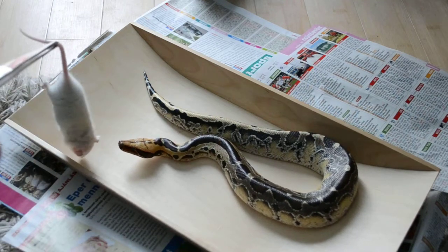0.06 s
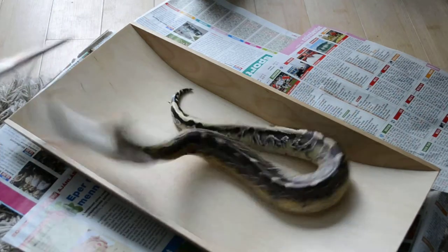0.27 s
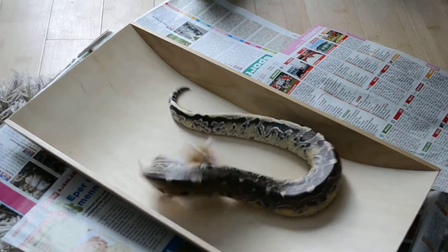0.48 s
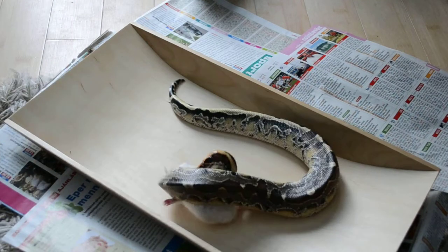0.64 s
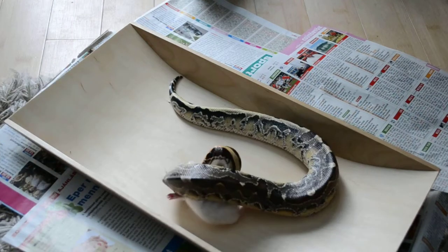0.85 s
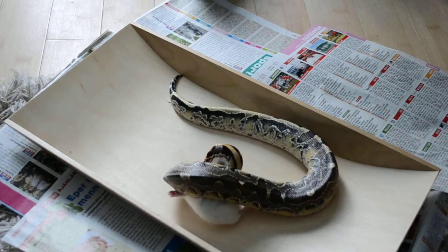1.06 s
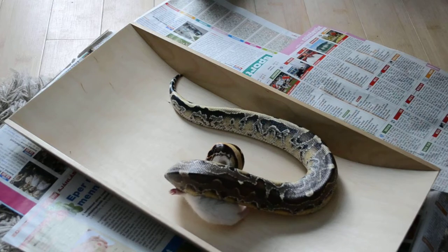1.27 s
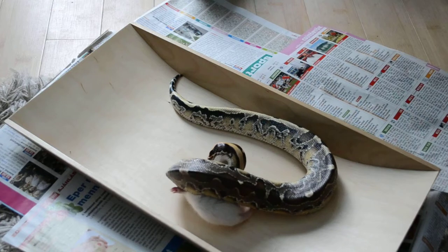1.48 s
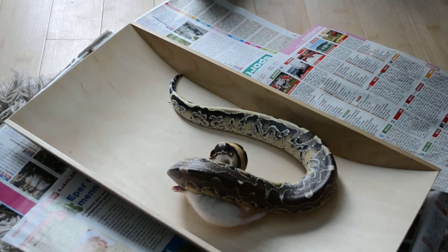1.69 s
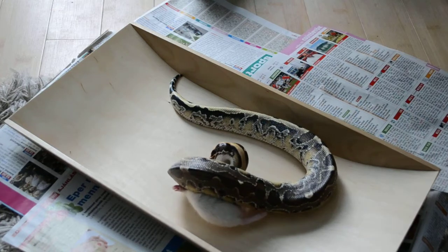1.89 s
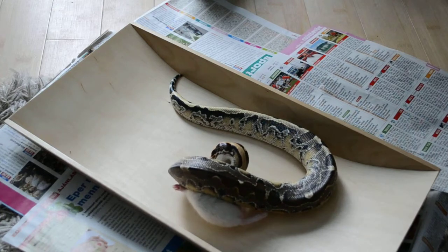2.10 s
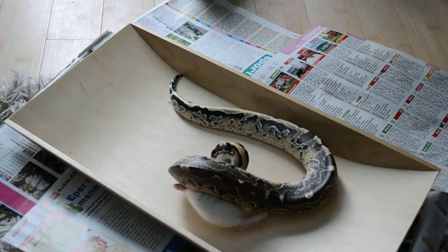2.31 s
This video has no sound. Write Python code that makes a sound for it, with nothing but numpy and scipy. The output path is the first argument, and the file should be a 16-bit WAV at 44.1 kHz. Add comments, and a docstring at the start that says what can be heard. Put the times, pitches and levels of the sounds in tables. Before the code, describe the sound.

A sharp steel snap at a snake's strike, followed by wooden clacks and faint rubbing.

```python
"""Steel tongs snap shut and ring briefly as a python strikes at the rat they hold.
The snake drops with it onto a wooden tray, which knocks, rocks and rings. Claws and scales scuff
the wood, and the scales hiss over it as the body coils. One microphone stands close by in a small
room, with the steady noise of the room and a faint motor hum behind it all."""
import sys
import numpy as np
from scipy import signal
from scipy.fft import rfft, irfft
from scipy.io import wavfile

SR = 44100
rng = np.random.default_rng(int(sys.argv[2]) if len(sys.argv) > 2 else 0)


def digitize_waveform(pressure):
    """Quantize a signal to 16-bit integers and store it at the path in sys.argv[1].

    Rows of a 2-D input are taken as channels; values are limited to [-1, 1].
    """
    field = np.atleast_2d(pressure).T
    bounded = np.clip(field, -1, 1)
    quanta = np.round(bounded * 32767).astype(np.int16)
    wavfile.write(sys.argv[1], SR, quanta)


N = 108045
TIME = np.arange(N) / SR

# The crack of the closing tips. Each row: frequency in Hz, gain in dB.
CRACK_SPECTRUM = [(60, -25), (200, -9), (500, -3), (1400, -2), (2800, -9.5), (4500, -7.5), (7100, -6.5),
                  (8000, -15), (9400, 0.5), (11500, -2.5)]
# The modes of the steel. Each row: frequency in Hz, level in dB, time to fall 60 dB in seconds.
STEEL_MODES = [(2083, -47, .025), (3660, -30, .032), (3857, -38, .06), (4590, -21, .012),
               (5814, -25.5, .014), (6941, -33, .068), (8530, -18, .011), (9857, -40, .08),
               (10140, -19, .007), (10060, -33, .04), (11150, -28, .005)]

def tongs(snap_s=.2415):
    """Close to the microphone, the tips meet with a hard crack, chatter and set the steel ringing."""
    blow = click(snap_s, db=0)
    chatter = burst(snap_s, db=-.5, decay_s=.0027)
    bright_chatter = chatter - soften(chatter, hz=1502)
    crack = colour(blow + bright_chatter, CRACK_SPECTRUM)
    return room(crack + ring(blow, STEEL_MODES, sign=1), wet_db=-14.5)


# The landing and rocking. Each row: start in seconds, strength in dB, treble cutoff in Hz, drive to the
# tray's modes in dB, then the struck spot's pitch in Hz, gain in dB and time to fall 60 dB in seconds.
TRAY_KNOCKS = [(0.3058, -7, 3600, -8, 3096, -23, 0.078), (0.3065, -6.5, 2800, -29, 1910, -20, 0.0092),
               (0.3091, -9.5, 2860, -29, 1200, -19.5, 0.011), (0.3164, 0.5, 8000, 0.5, 1710, -25, 0.0039),
               (.3220, -16, 5960, -25, 5410, -16, 0.018), (0.4304, -19, 1010, -19, 1145, -39.5, .03),
               (.4313, -14.5, 1390, 3, 1560, -13, .011), (0.4465, -18.5, 2750, -13, 3590, -27.5, 0.02)]
# The clack of the wood. Each row: frequency in Hz, gain in dB.
CLACK_SPECTRUM = [(60, -40), (170, -21), (300, -11.5), (520, 2), (800, -4), (1200, 0.5), (2300, 4.5),
                  (3100, 2), (4000, -3), (7000, -3), (10500, -6.5), (12500, -27)]
# The modes of the whole tray. Each row: frequency in Hz, gain in dB, time to fall 60 dB in seconds.
TRAY_MODES = [(522, -47, .22), (612, -48, .11), (742, -46, .11), (1002, -46, .1), (1137, -43, .11),
              (1201, -36, .125), (1388, -47, .1), (1527, -42, .14), (1680, -46, .2), (1875, -42, .09),
              (1947, -45, .16), (2005, -45, .13), (2290, -45, .09), (2581, -40, .1), (2910, -43, .09),
              (3123, -44, .09)]

def tray():
    """Each contact gives a woody clack with the pitch of the struck spot and sets the tray ringing."""
    blows, drive, spots = np.zeros((3, N))
    for start_s, db, cutoff_hz, drive_db, *spot_mode in TRAY_KNOCKS:
        blow = soften(click(start_s, db), cutoff_hz)
        blows += blow
        drive += from_db(drive_db) * blow
        spots += ring(blow, [spot_mode])
    clacks = colour(blows, CLACK_SPECTRUM) + spots
    return room(clacks, wet_db=-6) + ring(drive, TRAY_MODES)


# Touches on the tray. Each row: start in seconds, strength in dB, decay in seconds, treble cutoff in Hz.
SCUFF_TOUCHES = [(0.2841, -12.5, .003, 2230), (0.287, -18, 0.0029, 7110), (0.3335, -21, .0007, 10000),
                 (.385, -26, 0.00062, 8000), (.444, -28, 0.0044, 6000), (.776, -24, .008, 2100),
                 (2.258, -25, 0.01, 2400)]
# The tone of scuffed wood. Each row: frequency in Hz, gain in dB.
SCUFF_SPECTRUM = [(200, -28), (900, -10.5), (1600, 6.5), (2700, -2), (7000, 3.5), (10000, -4), (12000, 3)]

def scuffs():
    """Claws and scales catch the wood in light, gritty touches, heard close and almost dry."""
    touches = sum(soften(burst(s, db, decay_s), hz) for s, db, decay_s, hz in SCUFF_TOUCHES)
    return room(colour(touches, SCUFF_SPECTRUM), wet_db=-20)


# Scales sliding, and the body rubbing as it lunges and tightens. Each row: time in seconds, level in dB.
SLIDE_LEVELS = [(.12, -105), (.13, -59.5), (.16, -54.5), (.23, -61.5), (.27, -56.5), (.39, -60),
                (.46, -63.5), (.57, -65.5), (.65, -71.5), (.71, -81), (1.42, -83.5), (1.52, -80.5),
                (1.78, -72), (1.88, -85.5), (2.22, -81), (2.28, -74.5), (2.37, -70), (2.45, -75)]
RUB_LEVELS = [(0, -90), (.17, -77.5), (.205, -58.5), (.235, -73), (.7, -81), (1.25, -70.5), (1.34, -66.5),
              (1.44, -68), (1.55, -61), (1.62, -65), (1.8, -61.5), (1.95, -72), (2.45, -71)]
# The tone of the slide and of the rub. Each row: frequency in Hz, relative level in dB.
SLIDE_SPECTRUM = [(150, -15.5), (500, 7), (2300, 2.5), (3700, 4.5), (5200, 1), (7200, 1.5), (7900, -8),
                  (8600, 3.5), (10400, -5.5), (11500, -17)]
RUB_SPECTRUM = [(100, -18.5), (500, 2.5), (800, 1), (1600, 0.5), (3000, -4), (6000, -22.5), (11000, -36)]

def snake(grains_per_s=550, grain_share=.35, flutter_db=.7):
    """Scales slide over the tray with a fine grainy hiss; the coils rub with a duller one."""
    contacts = rng.random(N) < grains_per_s / SR
    grains = rms_one(contacts * rng.standard_normal(N))
    friction = np.sqrt(grain_share) * grains + np.sqrt(1 - grain_share) * rng.standard_normal(N)
    flutter = from_db(flutter_db * narrow_noise(0, width_hz=60))
    slide = level(SLIDE_LEVELS) * rms_one(colour(friction, SLIDE_SPECTRUM))
    rub = level(RUB_LEVELS) * noise(RUB_SPECTRUM)
    return flutter * (slide + rub)


# The small room's reverberation. Each row: frequency in Hz, time to fall 60 dB in seconds.
ROOM_DECAY = [(150, .45), (530, 0.34), (1400, .29), (3700, 0.17), (10000, .2)]

def room(x, wet_db, delay_s=.00033, build_s=.00067):
    """The walls return a diffuse tail to the microphone; it dies faster in the treble."""
    t, hz = TIME[:SR // 2], np.fft.rfftfreq(SR // 2, 1 / SR)
    white = rfft(rng.standard_normal(len(t)))
    centres_hz = np.geomspace(100, 13000, 8)
    tail = np.zeros(len(t))
    for centre, weights in zip(centres_hz, np.eye(len(centres_hz))):
        band = irfft(white * at_hz(np.c_[centres_hz, weights], hz), len(t))
        tail += band * from_db(-60 * t / at_hz(ROOM_DECAY, centre))
    tail *= 1 - np.exp(-np.maximum(t - delay_s, 0) / build_s)
    return x + from_db(wet_db) * signal.fftconvolve(x, tail / np.linalg.norm(tail))[:N]


# The room tone around the microphone. Each row: frequency in Hz, relative level in dB.
ROOM_TONE_SPECTRUM = [(25, -29), (60, -18), (95, -9), (125, -2.5), (165, -6.5), (260, -3), (380, -1.5),
                      (500, 4), (760, -3), (1020, 1), (1800, -3), (2500, -9.5), (2760, -1), (3400, -13.5),
                      (3900, -6.5), (5000, -17), (6500, -21), (8000, -28.5), (9200, -28), (11500, -38.5)]
# A motor in the room. Each row: frequency in Hz, level in dB, share of the power that wavers.
MOTOR_PARTIALS = [(233.4, -76.5, .35), (308.5, -75, .35), (626, -82, 0.61), (2700, -79, .7)]

def room_tone_and_motor():
    """Behind the tray, steady room noise and a motor's faint, wavering hum."""
    out = from_db(-62.5) * noise(ROOM_TONE_SPECTRUM)
    for hz, db, share in MOTOR_PARTIALS:
        steady = np.sqrt(2) * np.sin(2 * np.pi * (hz * TIME + rng.random()))
        wavering = narrow_noise(hz, width_hz=12)
        out += from_db(db) * (np.sqrt(1 - share) * steady + np.sqrt(share) * wavering)
    return out


def click(start_s, db):
    """One hard contact as a single impulse."""
    return from_db(db) * (np.arange(N) == int(start_s * SR))


def burst(start_s, db, decay_s):
    """A dying spray of tiny contacts with the energy of one impulse."""
    t = TIME[:SR // 10]
    spray = rng.standard_normal(len(t)) * np.exp(-t / decay_s)
    return np.pad(from_db(db) * spray / np.linalg.norm(spray), (int(start_s * SR), N))[:N]


def soften(x, hz):
    """A soft contact loses its treble."""
    return signal.sosfilt(signal.butter(2, hz, fs=SR, output="sos"), x + 1e-18)


def ring(x, modes, sign=-1):
    """Decaying modes in parallel; signs alternate, or agree (sign=1) to leave dips between the modes."""
    out = np.zeros(N)
    for k, (hz, db, t60) in enumerate(modes):
        radius, angle = from_db(-60 / (t60 * SR)), 2 * np.pi * hz / SR
        feedback = [1, -2 * radius * np.cos(angle), radius ** 2]
        out += sign ** k * from_db(db) * signal.lfilter([.5, 0, -.5], feedback, x + 1e-18)
    return out


def colour(x, spectrum, size=4096):
    """Causal (minimum-phase) filter with the given spectrum."""
    gain = from_db(at_hz(spectrum, np.fft.rfftfreq(size, 1 / SR)))
    cepstrum = irfft(np.log(gain))
    cepstrum[1:size // 2] *= 2
    cepstrum[size // 2 + 1:] = 0
    response = irfft(np.exp(rfft(cepstrum)))[:size // 2]
    return signal.fftconvolve(x, response)[:N]


def noise(spectrum):
    """Coloured noise of unit rms."""
    return rms_one(colour(rng.standard_normal(N), spectrum))


def narrow_noise(hz, width_hz):
    """Noise in a narrow band, unit rms."""
    offset = (np.fft.rfftfreq(N, 1 / SR) - hz) / (width_hz / 2)
    return rms_one(irfft(rfft(rng.standard_normal(N)) / (1 + offset ** 2), N))


def level(curve):
    """Gain over time from rows of seconds and dB."""
    return from_db(np.interp(TIME, *np.transpose(curve)))


def at_hz(points, hz):
    """Read a table on a log-frequency axis."""
    points_hz, values = np.transpose(points)
    return np.interp(np.log(np.maximum(hz, 1)), np.log(points_hz), values)


def from_db(db):
    """Decibels to gain."""
    return 10 ** (np.asarray(db) / 20)


def rms_one(x):
    """Scale to unit rms."""
    return x / np.sqrt(np.mean(x ** 2) + 1e-20)


def scene():
    """All sources meet at one microphone near the tray."""
    return (tongs() + tray() + scuffs() + snake() + room_tone_and_motor())[None]


def record(dry, bass_hz=37.46, treble_hz=11120, stop_hz=13600):
    """The microphone loses the deep bass, rolls off the high treble and cuts the very top."""
    thin = signal.sosfilt(signal.butter(2, bass_hz, "high", fs=SR, output="sos"), dry)
    dull = signal.sosfilt(signal.butter(12, treble_hz, fs=SR, output="sos"), thin)
    return signal.sosfilt(signal.cheby2(14, 50, stop_hz, fs=SR, output="sos"), dull)


dry = scene()
out = record(dry)
digitize_waveform(out)
```